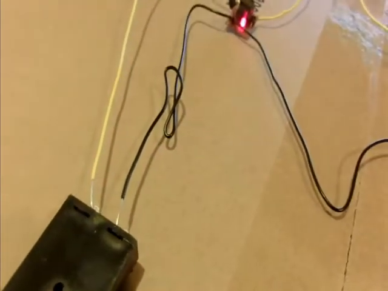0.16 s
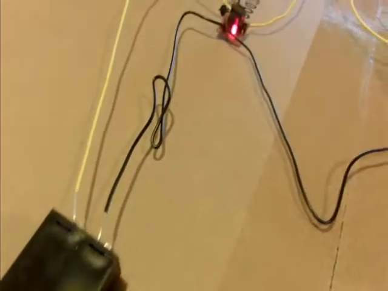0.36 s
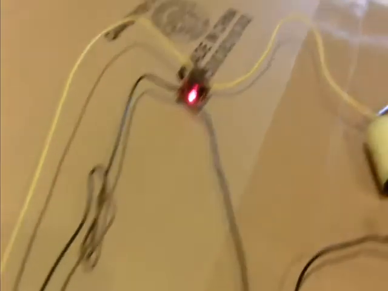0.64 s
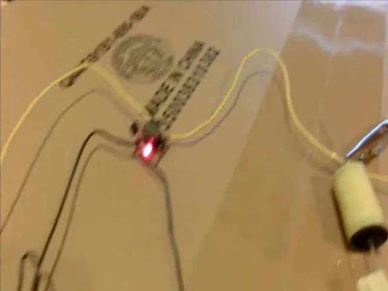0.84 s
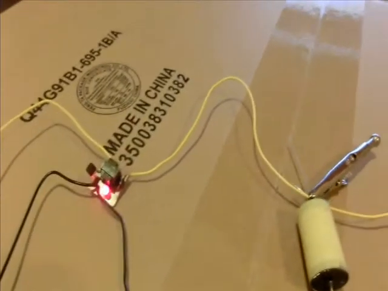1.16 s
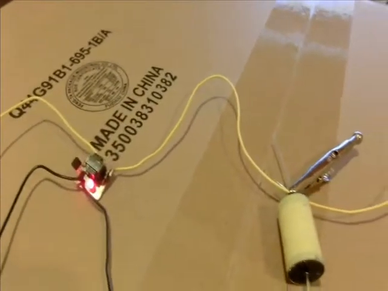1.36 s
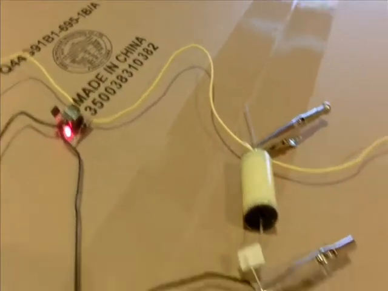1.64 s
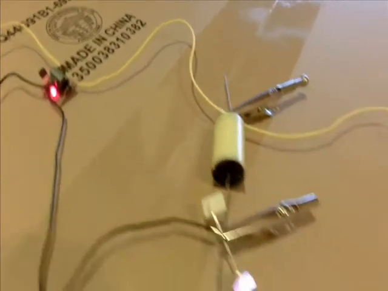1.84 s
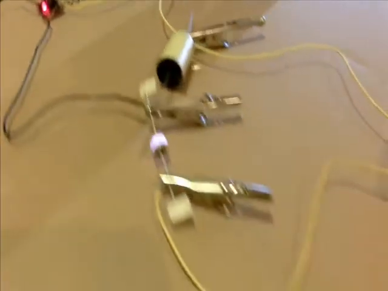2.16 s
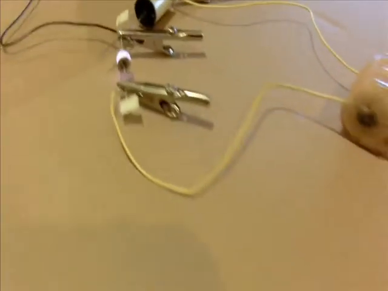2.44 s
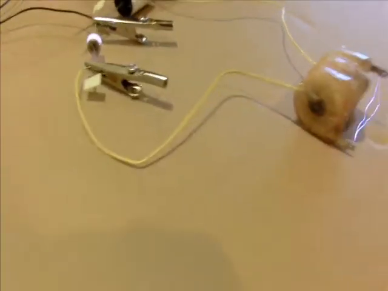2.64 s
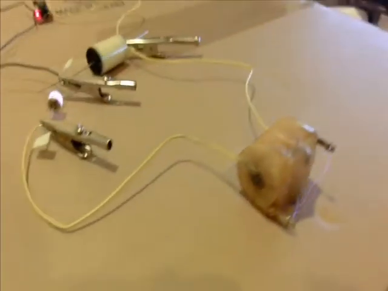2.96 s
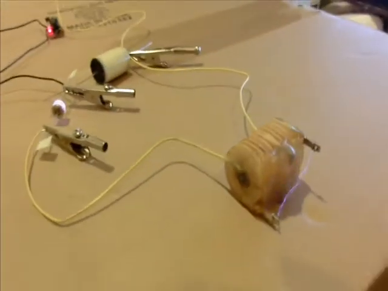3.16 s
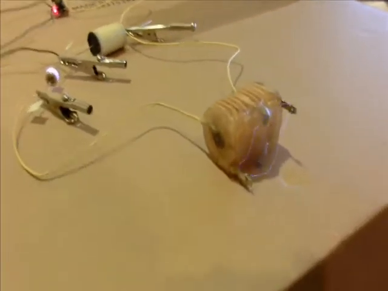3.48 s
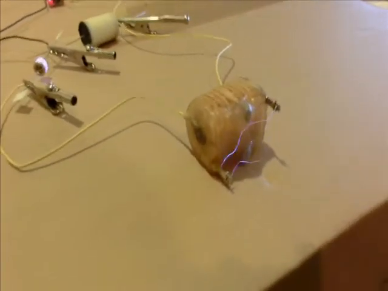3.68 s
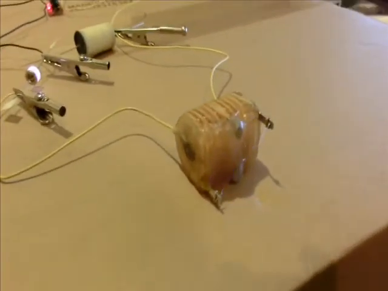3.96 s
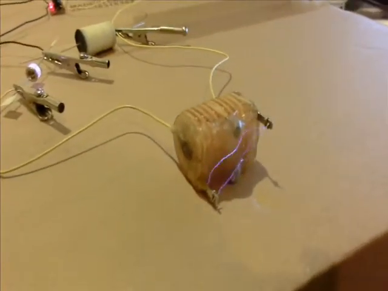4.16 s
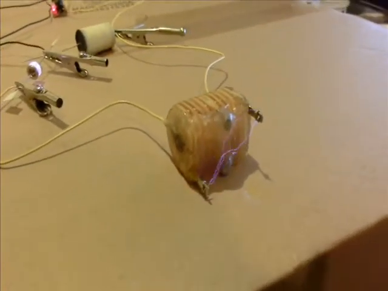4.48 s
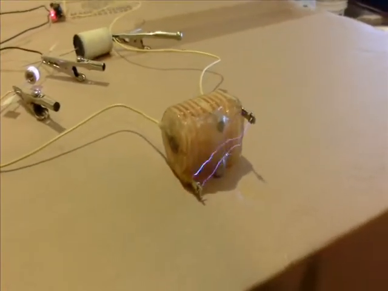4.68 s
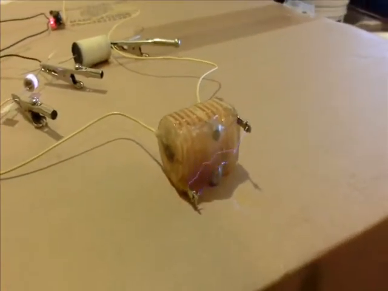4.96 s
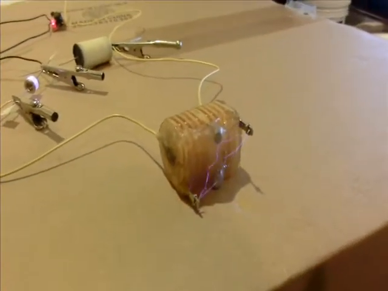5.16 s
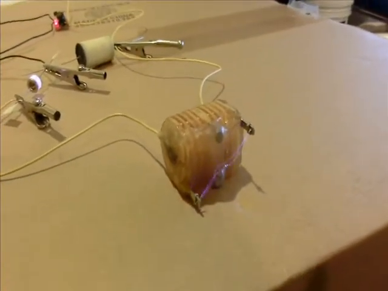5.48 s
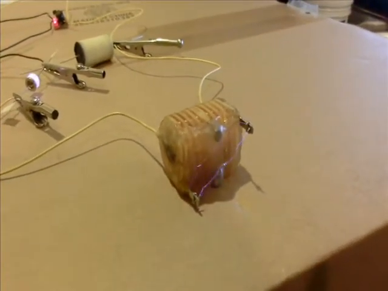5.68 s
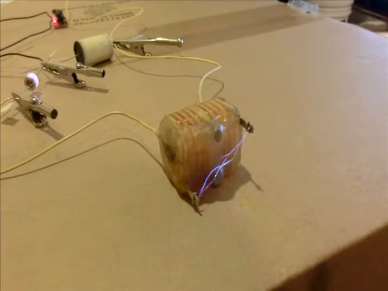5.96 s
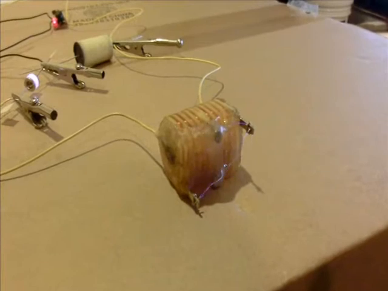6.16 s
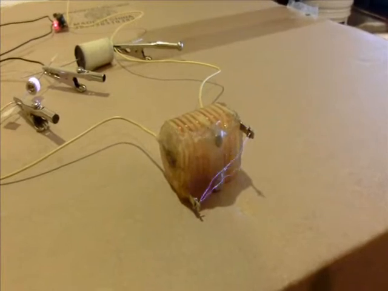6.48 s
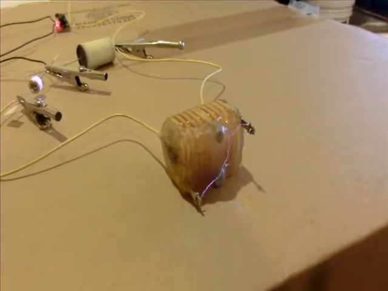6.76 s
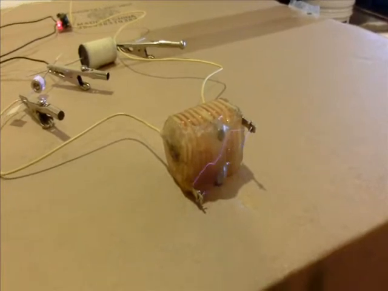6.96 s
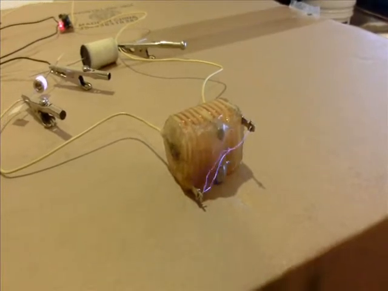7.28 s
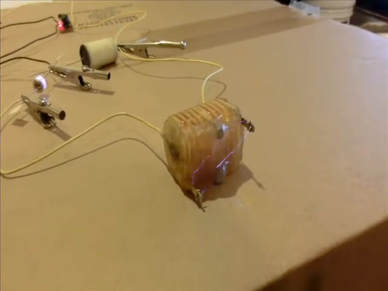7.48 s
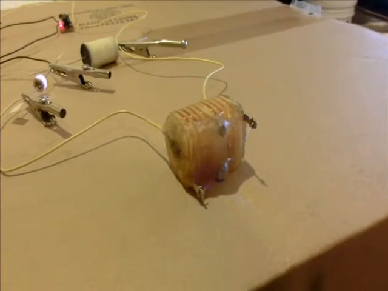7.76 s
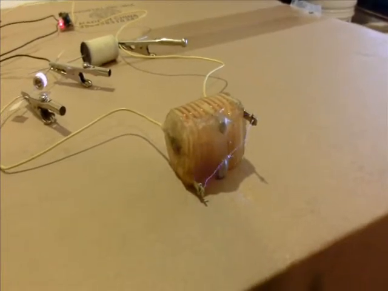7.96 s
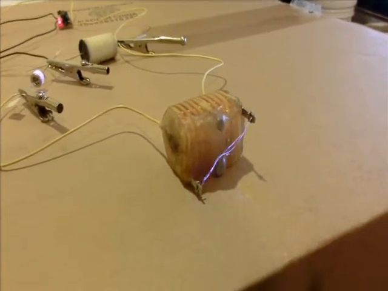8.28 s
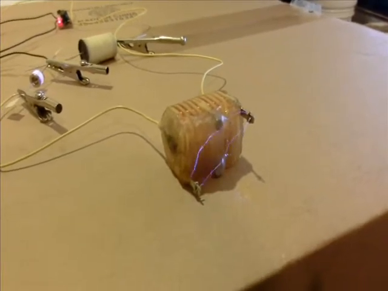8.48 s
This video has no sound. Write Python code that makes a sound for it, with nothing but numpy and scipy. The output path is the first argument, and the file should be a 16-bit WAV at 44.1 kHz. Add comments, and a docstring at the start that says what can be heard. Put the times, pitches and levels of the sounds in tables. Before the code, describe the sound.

A loud, raspy electric buzz runs from the start to the end at about 8.6 seconds: a small high-voltage coil sparking roughly 110 times a second, each spark a sharp snap. At first the handheld stereo microphone is off to the side, and the small room smears the snaps into a hiss. From about 0.7 to 2 seconds the tone turns hollow and shifting. Around 2.3 seconds the buzz swells as the microphone passes over the circuit, and the echoes weaken. By 3.7 seconds it is close to the coil, drier, with a bright ringing edge. Short stutters and single louder cracks interrupt irregularly throughout, the pops coming several times a second in the later half. Near 8 seconds the treble swirls briefly. The sparking gradually slows to about 95 a second, lowering the pitch slightly. A very faint, steady room rumble lies underneath.

```python
"""A home-made high-voltage circuit sparks across its coil about 110 times a second in a rumbling room.
Each spark is one sharp shock wave; hard surfaces echo it and the small room smears it into a hiss.
A hand-held stereo camera starts off to the side. By 2.4 s it is over the circuit and the echoes weaken.
By 3.7 s it has settled close to the coil, where the snaps ring and there is less room hiss.
The buzz stutters and cracks all along, and slows to about 95 sparks a second as the battery sags."""
import sys
import numpy as np
from scipy import signal
from scipy.fft import rfft, irfft
from scipy.io import wavfile

SR = 44100
rng = np.random.default_rng(int(sys.argv[2]) if len(sys.argv) > 2 else 0)


def unload_audio(sound):
    """Save the sound as a 16-bit wav file, at the path given as the first command line argument."""
    columns = np.transpose(np.atleast_2d(sound))
    # keep every value between -1 and 1, then stretch to whole-number steps
    steps = np.round(np.clip(columns, -1, 1) * 32767)
    wavfile.write(sys.argv[1], SR, steps.astype(np.int16))


N = 380141
CUTOFF_HZ = 15400   # the sound fades out above this pitch


def from_db(db):
    """Turn decibels into a number to multiply by."""
    return 10 ** (np.asarray(db) / 20)


def at_time(rows, seconds):
    """Read each column of a table at the given times, gliding between rows."""
    times, *columns = np.transpose(rows)
    return np.array([np.interp(seconds, times, c) for c in columns])


def at_hz(rows, hz):
    """Read each column of a table at the given pitches, gliding evenly through each octave."""
    points, *columns = np.transpose(rows)
    return np.array([np.interp(np.log(hz + 1), np.log(points), c) for c in columns])


def hump(hz, centre_hz, octaves):
    """A smooth hill of height 1 around one pitch."""
    return np.exp(-(np.log2((hz + 1) / centre_hz) / octaves) ** 2)


def humps(hz, rows):
    """Several peaks and dips added up, in decibels."""
    return sum(db * hump(hz, centre, width) for centre, width, db in rows)


def sharp_click(db):
    """The spectrum of a click with this tone: sharp front first, ringing after (minimum phase)."""
    cepstrum = irfft(db * np.log(10) / 20)
    half = cepstrum.shape[-1] // 2
    cepstrum[..., 1:half] *= 2
    cepstrum[..., half + 1:] = 0
    return np.exp(rfft(cepstrum))


def dying_noise(fade_s, onset_s, size, count):
    """Noise bursts of equal energy that swell, then drop 60 dB in fade_s."""
    t = np.arange(size) / SR
    swell = 1 - np.exp(-(t / onset_s) ** 2)
    tail = rng.standard_normal((count, size)) * from_db(-60 * t / fade_s) * swell
    return tail / np.sqrt(np.sum(tail ** 2, axis=1, keepdims=True))


def lay_out(spectra, hz, seconds):
    """One channel with each spark's wave set down at its moment."""
    start, fraction = np.divmod(seconds * SR, 1)
    waves = irfft(spectra * np.exp(-2j * np.pi * hz * fraction[:, None] / SR))
    where = start.astype(int)[:, None] + np.arange(waves.shape[1])
    return np.bincount(where.ravel(), waves.ravel(), N)[:N]


# Tone of the background rumble: pitch_hz, relative_db
RUMBLE_TONE = [(20, -3), (50, -2.5), (120, -7.5), (300, -11), (1000, -13.5), (8000, -16.5)]


def rumble():
    """The room's quiet, steady rumble, partly shared by both microphones."""
    white = rng.standard_normal((2, N)) + rng.standard_normal(N)
    tone = from_db(at_hz(RUMBLE_TONE, np.fft.rfftfreq(N, 1 / SR)))
    noise = irfft(rfft(white) * tone, N)
    return noise / noise.std() * from_db([[-60.5], [-53.5]])   # left, right


# How the sparks and the room come across as the camera moves: time_s, direct_db, brightness_db, room_db
BALANCE = [(0.0, 0.1, -11, 0.1), (0.85, 1, -7.5, 0.5), (1.8, 1, -5, -1.4), (2.3, 4.5, -3, -3.5),
           (2.8, 1.85, -6, -7), (3.3, 0.8, 1, -10), (3.65, -1.5, -3.5, -10.5), (4.6, -1.23, -4, -10),
           (5.9, -2.5, -4.5, -12), (6.65, -1.64, -5.5, -10), (7.75, -2.5, -5, -14), (8.2, -1.5, -5, -11.5),
           (8.6, -2.5, -4.5, -13)]
# Tone of the room's answer to one snap: pitch_hz, left_db, right_db
ROOM_TONE = [(126, -23.5, -17), (410, -8.5, -19.5), (760, -40, -0.5), (1150, -15, -9), (1770, -6, -7),
             (2300, -3, -1.5), (3860, -24, -1), (6470, 0, -1.5), (8300, -7, 0.5), (11800, -9, 0),
             (14200, -17, 2)]


def room_hiss(seconds, strength_db, hz, level_db, routes):
    """The snaps' tails blur into a hiss; sparks jump between a few routes, each with its own tail."""
    _, _, room_db = at_time(BALANCE, seconds)[:, :, None]
    waves = [sharp_click(level_db + strength_db + room_db + tone) for tone in at_hz(ROOM_TONE, hz)]
    route = rng.integers(0, routes, len(seconds))
    shared, *own = [dying_noise(fade_s=.12, onset_s=.0002, size=SR // 4, count=2)
                    for _ in range(routes + 1)]
    # below 570 Hz the room answers every route alike
    low, high = (signal.butter(2, 570, kind, fs=SR, output="sos") for kind in ("low", "high"))
    hiss = 0
    for k in range(routes):
        tail = signal.sosfilt(low, shared) + signal.sosfilt(high, own[k])
        sent = np.array([lay_out(wave[route == k], hz, seconds[route == k]) for wave in waves])
        hiss = hiss + signal.oaconvolve(sent, tail, axes=1)[:, :N]
    return hiss


# Where the camera is: time_s, position (0 to the side, 1 over the circuit, above 1 close to the coil)
CAMERA_PATH = [(1.85, 0.047), (2.4, 1.01), (3.15, 1.06), (3.7, 1.294)]
# Strength of the echoes off four nearby surfaces: position, first_db, second_db, third_db, fourth_db
ECHO_LEVELS = [(0, -5.5, -9, -7.5, -7), (0.9, -8.5, -14, -14, -13), (1.5, -17, -22, -20, -20)]
# How late those echoes arrive: time_s, first_s, second_s, third_s, fourth_s
ECHO_DELAYS = [(0.0, .00078, .00122, .003, .00745), (0.6, .00081, .00133, .00287, .00742),
               (1.0, .00086, .00143, .00283, .00744), (1.6, .00092, .00157, .00284, .0075),
               (2.0, .00104, .00175, .00308, .00763), (2.5, .00118, .00194, .00322, .0078),
               (3.2, .00111, .00195, .0032, .00784), (3.8, .00079, .0018, .00308, .00788)]
# An extra echo that swells briefly and makes the treble swirl: time_s, delay_s, level_db
SWIRL = [(7.7, .0009, -30), (7.85, .00094, -8), (8.1, .00104, -9), (8.3, .00112, -40)]


def nearby_echoes(hz, seconds):
    """The direct wave plus echoes that slide and fade as the camera closes in."""
    position = at_time(CAMERA_PATH, seconds)[0]
    delays = at_time(ECHO_DELAYS, seconds)
    delays = delays + .00001 * rng.standard_normal(delays.shape)   # each spark lies a little elsewhere
    echoes = list(zip(delays[:, :, None], at_time(ECHO_LEVELS, position)[:, :, None]))
    paths, energy = 1, 1
    for delay, db in echoes + [at_time(SWIRL, seconds)[:, :, None]]:
        gain = from_db(db) * hz ** 2 / (hz ** 2 + 4800 ** 2)   # small surfaces return little bass
        paths = paths + gain * np.exp(-2j * np.pi * hz * delay)
        energy = energy + gain ** 2
    return paths / np.sqrt(energy)


# A broad peak in the tone that wanders, swells and fades: time_s, pitch_hz, level_db
WANDERING_PEAK = [(0.1, 2600, 1.5), (0.6, 3300, 1), (1.6, 3780, 0), (1.85, 5000, -1), (2.1, 4540, -1),
                  (2.3, 4970, 1), (2.55, 4880, 4), (2.8, 4960, 0.5), (3.2, 4370, 3.5), (3.95, 3090, 0),
                  (4.2, 2940, 3.5), (4.45, 3200, 1.5), (5.0, 5000, 1)]
# The hollow tone heard while passing the circuit: pitch_hz, width_octaves, level_db
PASSING_HOLLOW = [(690, .2, 2.5), (1080, .15, 2), (2520, .09, 2), (2960, .075, -12), (3720, .06, 4),
                  (4290, .04, 5)]
# That hollow tone comes and goes, sinking a little: time_s, depth (0 to 1), pitch_ratio
PASSING_DEPTH = [(0.5, 0, 1.03), (0.8, .9, 1.01), (1.25, 1.0, 1.0), (1.7, .6, .99), (2.3, 0, .98)]
# The ring flares for a moment as the sparks take another route: time_s, pitch_hz, level_db
FLARES = [(1.79, 6000, 3.5), (2.75, 4700, 0), (3.15, 4200, 2.5), (3.2, 5250, 1.5), (4.7, 5100, 2.5),
          (4.78, 6400, 2), (5.4, 5100, 4.5), (5.75, 6300, -2), (6.02, 6300, 3), (6.52, 6100, 1),
          (6.7, 6350, 0), (7.04, 5100, -1.5), (8.09, 5670, 0.5), (8.28, 6100, 2)]


def shifting_tone(seconds, hz, flare_s):
    """Tone changes that span many sparks, in decibels: wandering peak, passing hollow and flares."""
    peak_hz, peak_db = at_time(WANDERING_PEAK, seconds)[:, :, None]
    depth, ratio = at_time(PASSING_DEPTH, seconds)[:, :, None]
    flares = sum(db * np.exp(-((seconds[:, None] - s) / flare_s) ** 2) * hump(hz, centre, octaves=.17)
                 for s, centre, db in FLARES)
    return hump(hz, peak_hz, octaves=.5) * peak_db + depth * humps(hz / ratio, PASSING_HOLLOW) + flares


# Stutters, which are short runs of feeble sparks: start_s, spark_count, level_db
STUTTERS = [(0.197, 2, -1.5), (0.3802, 4, -5), (0.5167, 1, -6), (0.6653, 1, -7), (0.693, 1, -15),
            (1.5286, 1, -8), (1.6533, 1, -4), (2.384, 1, -7), (2.716, 1, -7), (2.7847, 2, -7),
            (3.007, 1, -4), (3.036, 1, -7), (3.0658, 2, -3), (3.114, 1, 0), (3.4003, 2, -10),
            (3.9275, 3, -4.5), (3.9672, 3, -7.5), (4.076, 1, -4), (4.107, 1, -5), (4.127, 1, -2.5),
            (4.751, 1, -5), (4.893, 1, -7.5), (4.914, 1, -14), (4.975, 1, -7), (5.026, 1, -6),
            (5.0767, 2, -8), (5.239, 1, -7), (5.3005, 2, -3.5), (5.372, 1, -12), (5.781, 1, -6),
            (5.9344, 2, -7), (6.1492, 2, -7), (6.231, 1, -7), (6.293, 1, -10), (6.5935, 2, -8),
            (6.887, 2, -1), (6.959, 1, -4), (6.991, 1, -5), (7.064, 2, -2.5), (7.094, 1, -5),
            (7.187, 1, -9), (7.571, 1, -9), (7.686, 1, -10), (7.83, 2, -12), (7.945, 1, -15),
            (7.9963, 1, -12), (8.027, 1, -7), (8.14, 1, -9.5), (8.4156, 1, -6)]
# Single sparks that crack or pop out of the buzz: start_s, level_db, extra_knock_db, extra_ring_db
CRACKS = [(0.0036, 4, 0, 0.5), (1.1975, 6, -0.5, -3), (1.779, 3, -2, 2), (1.864, 1, 0, 0),
          (2.047, 5.5, 0, -3), (2.1718, 5, 1, -1), (2.326, -1, 7, 3), (2.9386, 6.5, -11, -5),
          (2.9863, 0.5, 3, -3), (3.135, 0.5, 6.5, -3), (3.9576, 4.5, -0.5, -3), (4.0166, 5, -1, -3),
          (4.067, 3, 0, 1.5), (4.306, 0.5, 5, 0), (4.5584, -1, 10, 1), (4.5793, 1, -13, 0),
          (4.7, -0.5, -3, 2.5), (4.8316, -1.5, 7, 1), (4.882, 1.5, 8, 1), (5.117, 8, -13, -10),
          (5.158, 0, 4, 4), (5.259, 0.5, 6, 1), (5.3311, 2.5, 5, -1), (5.5352, 4.5, 3, -5),
          (5.6682, 4.5, 2, -2.5), (5.924, -0.5, 7, 0), (6.0355, 1.5, 4.5, 0.5), (6.1072, 3, 5, -2),
          (6.1168, -1, 4.5, -2), (6.2712, 0, 3, -2), (6.3748, 0, 5, 1), (6.4587, 2, 5, 0),
          (6.562, 2.5, 4, -3), (6.656, 1.5, 7, 1), (6.699, 0.5, 6, 1), (7.022, 0.5, 6, 2),
          (7.043, -2, 3, 9.5), (7.1141, 2.5, -2, -6), (7.177, 2, 6.5, 1.5), (7.3105, 1, 6, 1),
          (7.353, -1.5, 7, -2), (7.5811, 6, 3, -3.5), (7.6334, -4.5, 10, 1), (7.6447, 6.5, -7, -6),
          (7.7678, -2.5, 5, 7), (7.819, 2.5, 8, 0), (7.9541, -2.5, 9, 1), (8.079, 2.5, -1, 3),
          (8.1205, -1, 7, -5), (8.278, 0, 7, 4), (8.289, 0.5, 2, 3), (8.405, 0.5, 7, -4),
          (8.478, -0.5, 8, 4.5), (8.52, 0.5, 6.5, -1)]


def sparks(jitter, wait_per_db, early_share, early_by):
    """Times and strengths: a capacitor charges until a spark jumps, never at quite the same voltage."""
    fresh_hz, sagged_hz, sag_s = 110.13, 91.85, 5.0   # the battery sags, so charging gets slower
    t = np.arange(N) / SR
    cycles = np.cumsum(sagged_hz + (fresh_hz - sagged_hz) * np.exp(-t / sag_s)) / SR
    events = sorted(list(STUTTERS) + [(s, 1, db) for s, db, _, _ in CRACKS])
    event_s, runs, event_db = np.transpose(events)
    event_cycles = np.interp(event_s, t, cycles)
    firsts = np.r_[0, np.cumsum(np.round(np.diff(event_cycles)))].astype(int)
    count = int(cycles[-1]) + 2
    db = .9 * rng.standard_normal(count)
    db -= 3.6 * (rng.random(count) < .11)   # now and then the gap fires weakly
    for first, run, level_db in zip(firsts, runs, event_db):
        db[first:first + round(run)] = level_db
    # a weak spark leaves charge behind, so the next one comes early; waits count charging cycles
    waits = 1 + jitter * rng.standard_normal(count) + wait_per_db * (db - db.mean())
    waits -= early_by * ((rng.random(count) < early_share) - early_share)   # some just fire early
    due = np.cumsum(waits) - waits
    # stutters and cracks keep their moments
    due += np.interp(np.arange(count), firsts, event_cycles - due[firsts])
    heard = due < cycles[-1]
    return np.interp(due[heard], cycles, t), db[heard]


# The low knock in the snaps: time_s, level_db
KNOCK = [(0.0, -5), (1.2, 0), (2.15, -1), (2.65, -3), (3.3, 1), (4.4, -3), (5.0, -1.5), (5.5, -2),
         (6.55, -2.5), (6.9, -3.5), (7.15, -1.5), (7.45, -5), (8.1, -3.5), (8.6, -5)]
# The boxy tone that every snap has: pitch_hz, width_octaves, level_db
BOXY = [(610, 0.098, 1), (780, 0.19, -2.5)]


def spark_tone(seconds, hz):
    """Each spark's length and slant set its low knock, its ring and its treble, in decibels."""
    knock_band = .51 / (1 + (hz / 2300) ** 4) + .5 * hump(hz, 1300, octaves=.55)
    ring_band = hump(hz, 4700, octaves=1.0)
    treble_band = 1 - 1 / (1 + (hz / 8000) ** 4)
    spread_db = (1.2, .6, .6)
    knock_db, ring_db, treble_db = (rng.standard_normal((len(seconds), 3)) * spread_db).T[:, :, None]
    for s, _, extra_knock_db, extra_ring_db in CRACKS:
        spark = np.argmin(abs(seconds - s))
        knock_db[spark], ring_db[spark] = extra_knock_db, extra_ring_db
    knock_db = knock_db + at_time(KNOCK, seconds).T
    return knock_band * knock_db + ring_band * ring_db + treble_band * treble_db + humps(hz, BOXY)


# The part of a snap that is new each time, next to its steady part: pitch_hz, left_db, right_db
CHANGING_PART = [(131, 1, 9), (600, -13, -8), (1300, -15, -10), (2400, -2, 0), (4700, -9, -7), (8100, 0, 1),
                 (12900, 6, -8)]


def snap_variation(hz, side, count):
    """Each snap sounds a little different in each microphone, most in the right one's bass."""
    share = from_db(at_hz(CHANGING_PART, hz)[side])
    smear = dying_noise(fade_s=.0011, onset_s=1 / SR, size=64, count=count)
    return (1 + share * rfft(smear, 2 * len(hz) - 2)) / np.hypot(1, share)


# Tone of a snap from the side and from above: pitch_hz, left_db, right_db
SIDE_TONE = [(130, -25, -13.5), (477, -18.5, -11), (756, -2, -10), (1110, -2.5, -12.5), (1440, -5, -14),
             (2060, -5.5, -20.5), (2600, -18, -7.5), (3320, -8, -9.5), (4000, -16.5, -17.5),
             (5340, -12.5, -9), (7500, -11.5, -9.5), (9750, -31, -2.5), (11400, -14, -1.5), (13200, -22, 0),
             (15100, -40, -10)]
ABOVE_TONE = [(130, -29.5, -14), (452, -18.5, -12), (960, -4.5, -17.5), (1470, -8, -12),
              (2010, -6.5, -12.5), (2600, -17, -9.5), (3640, -17, -11), (4200, -16, -5), (4800, -8, -7),
              (7500, -13, -7), (7300, -0.5, -9.5), (8280, -21, -13), (10350, -18, -1.5),
              (11900, -11.5, -3.5), (13100, -21, -2), (14600, -24, -6)]
# An exaggerated tone, partly blended in to give the bright, ringing snap close to the coil:
# pitch_hz, left_db, right_db
CLOSE_TONE_PULL = [(133, -83, -7), (520, -16, -5), (990, -7, -3), (1510, -15.5, 0.5), (1820, -5, -16),
                   (3370, -28, -10.5), (3600, -44, 3.5), (4680, -33, -5), (4750, 4, -11), (5540, -19, -22),
                   (5670, -19, 7.5), (6300, 23, -36), (6930, -12, 6), (7340, -8, -1.5), (8900, 11, -10.5),
                   (10330, 5, 0.5), (10470, 2, 9), (13100, -13, 17.5), (14600, 18, 24.5)]
# The hollow ring heard close to the coil: pitch_hz, width_octaves, level_db
COIL_RING = [(4480, .07, -3.5), (5430, .06, -4.5), (6150, .11, 4.5)]


def snaps(seconds, strength_db, hz, direct_db, scatter_db, left_lag_s):
    """Shock waves reach both microphones, with a brief scatter off the coil, clips and camera body."""
    count = len(seconds)
    position = at_time(CAMERA_PATH, seconds).T
    blend = np.maximum(1 - abs(position - np.arange(3)), 0)   # shares of the three tones below
    tones = np.array([at_hz(rows, hz) for rows in (SIDE_TONE, ABOVE_TONE, CLOSE_TONE_PULL)])
    level_db, bright_db, _ = at_time(BALANCE, seconds)[:, :, None]
    tilt = 1 / (1 + (7500 / (hz + 1)) ** 4) - .5
    ring_ratio = 1 + .022 * rng.standard_normal((count, 1))   # each spark's place shifts its ring
    ring_db = np.minimum(2 * blend[:, 2:], 1) * humps(hz / ring_ratio, COIL_RING)
    common_db = direct_db + strength_db + level_db + bright_db * tilt + ring_db
    spill = from_db(scatter_db) * hz / np.hypot(hz, 2500) / np.hypot(1, hz / 11000)
    echoes = nearby_echoes(hz, seconds)
    channels = []
    for side, lag in enumerate((left_lag_s, 0)):
        variation = snap_variation(hz, side, count)
        scatter = dying_noise(fade_s=.006, onset_s=.0026, size=256, count=count)
        roughness = (variation + spill * rfft(scatter, 2 * len(hz) - 2)) / np.hypot(1, spill)
        wave = sharp_click(common_db + blend @ tones[:, side]) * roughness
        channels.append(lay_out(-wave * echoes, hz, seconds + lag))
    return np.array(channels)


def scene():
    """One train of sparks makes both the snaps and the room's hiss, over the rumble."""
    hz = np.fft.rfftfreq(1024, 1 / SR)
    seconds, db = sparks(jitter=.011, wait_per_db=.002, early_share=.22, early_by=.042)
    rolloff_db = -30 * np.clip((hz - CUTOFF_HZ) / (SR / 2 - CUTOFF_HZ), 0, 1)
    tone_db = spark_tone(seconds, hz) + shifting_tone(seconds, hz, flare_s=.06)
    strength_db = db[:, None] + rolloff_db + tone_db
    direct = snaps(seconds, strength_db, hz, direct_db=.03, scatter_db=-12.5, left_lag_s=.00021)
    return direct + room_hiss(seconds, strength_db, hz, level_db=-2.0, routes=3) + rumble()


def record(dry):
    """The camera thins the deep bass, has one shallow dip in the treble and cuts the very top."""
    thinned = signal.sosfilt(signal.butter(1, 35, "high", fs=SR, output="sos"), dry)
    notched = signal.lfilter(*signal.iirnotch(12560, Q=45, fs=SR), thinned)
    top_cut = signal.firwin(121, CUTOFF_HZ, fs=SR)[None]
    return signal.oaconvolve(.5 * (thinned + notched), top_cut, "same", axes=1)


dry = scene()
out = record(dry)
unload_audio(out)
```